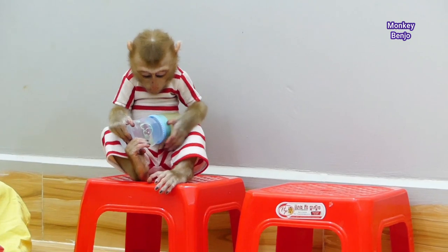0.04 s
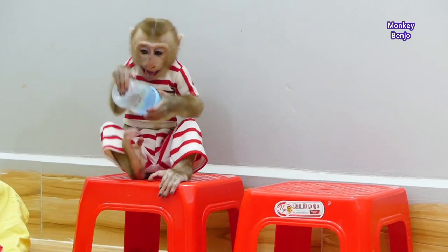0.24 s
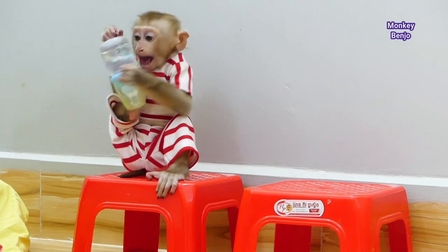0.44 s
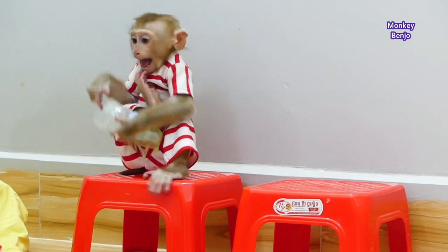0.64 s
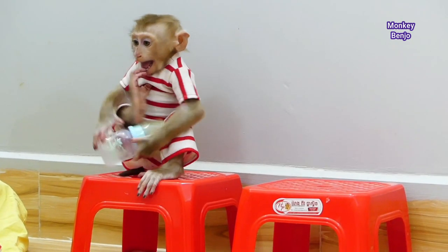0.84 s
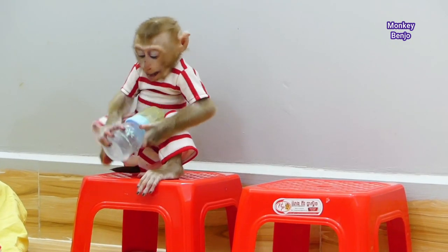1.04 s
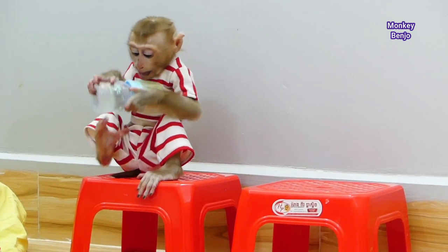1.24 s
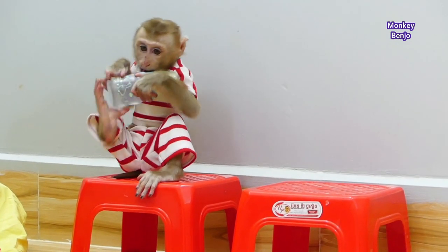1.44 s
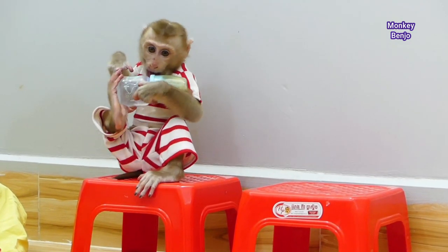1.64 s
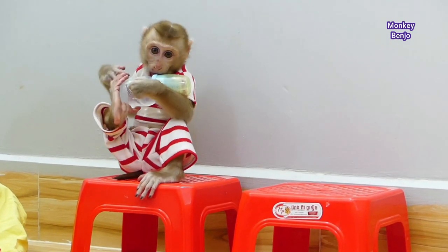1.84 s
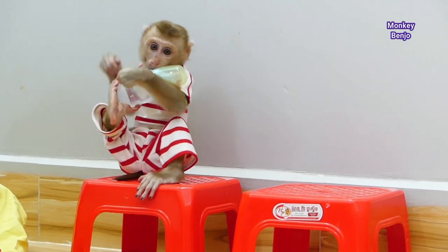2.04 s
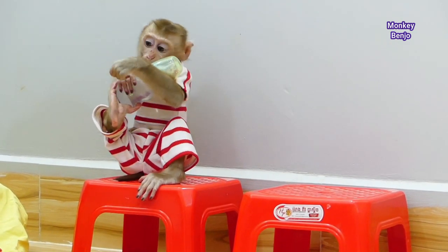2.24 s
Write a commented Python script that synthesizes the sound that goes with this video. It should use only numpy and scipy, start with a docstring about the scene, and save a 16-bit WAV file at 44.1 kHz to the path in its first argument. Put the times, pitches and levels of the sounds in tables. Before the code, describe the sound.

A small monkey gives five short, harsh, breathy rasps in quick succession, then a wet lip smack. Faint cloth rustles and ticks follow. The bare room echoes, with dull background noise and a low hum.

```python
"""In a bare, echoing room: five short, harsh rasps and a smack, probably from a small monkey
wrestling with a baby bottle. The rasps are all breath and no voice. Each opens with a snap and a
falling hiss; rough air then makes the mouth ring at a sliding pitch near 3-4 kHz, over weaker,
hollow tones. Faint rustles and ticks of handling, dull room noise and a low hum fill the pauses."""
import sys
import numpy as np
from scipy import signal
from scipy.fft import rfft, irfft
from scipy.io import wavfile

SR = 44100
rng = np.random.default_rng(int(sys.argv[2]) if len(sys.argv) > 2 else 0)


def dump(signal):
    """Clip the signal to [-1, 1] and save it as 16-bit WAV at the path in sys.argv[1]."""
    limited = np.clip(np.atleast_2d(signal).T, -1, 1)
    pcm = np.round(limited * 32767).astype(np.int16)
    wavfile.write(sys.argv[1], SR, pcm)


N = 105840
TIME = np.arange(N) / SR

# Rasps of breath (start [s], length [s], swell time [s], first ring pitch [Hz], last ring pitch [Hz],
# ring width [Hz], final ring level [dB], ring growth [dB], final throat level [dB], chest level [dB],
# hollow pitch [Hz], hollow level [dB], edge level [dB], hiss pitch [Hz], hiss level [dB])
RASPS = [(0.2222, 0.039, 0.0017, 3050, 3010, 376, -30.5, 4.5, -41.5, -51, 1020, -47.5, -39, 11000, -36.5),
         (0.414, 0.0582, 0.0066, 3670, 3970, 850, -32, 5, -37, -41, 855, -49, -42, 9560, -38),
         (0.656, 0.095, 0.093, 3500, 4440, 1340, -33, 0, -37.5, -51, 915, -46, -39, 9900, -34.5),
         (0.92, 0.09, 0.03, 4280, 3810, 900, -35, 4.5, -41.5, -46.5, 807, -50, -44, 9970, -38),
         (1.2038, 0.057, 0.0066, 3180, 3530, 1020, -40, 1, -45, -49.5, 783, -52, -47, 11100, -39)]
# Where the throat rings (pitch [Hz], width [Hz], relative level [dB])
THROAT_RINGS = [(1450, 410, 2), (2072, 580, 3), (3020, 1070, 4.5)]
# The bright edge above the throat's rings (pitch [Hz], width [Hz], relative level [dB])
EDGE_RINGS = [(5250, 2720, 1), (7000, 2100, -3.2)]
# Where the mouth rings in the closing smack (pitch [Hz], width [Hz], level [dB])
SMACK_RINGS = [(683, 280, -45), (1490, 220, -46), (2030, 470, -41.5), (3146, 540, -35), (3920, 1100, -43.5),
               (4450, 580, -46.5), (5290, 530, -44), (6030, 1200, -39.5), (6470, 530, -45),
               (9070, 1400, -43.5), (11600, 2600, -46.5)]
# Bright snaps of spit (start [s], pitch [Hz], width [Hz], level [dB])
SNAPS = [(0.228, 11500, 9000, -49), (.4157, 13000, 5000, -38.5), (.6625, 11400, 8900, -55),
         (0.929, 12600, 3500, -42), (0.972, 11000, 10900, -35), (1.2062, 12100, 2500, -40)]
# Clean pops, chirps and one chirp's wall echo
# (start [s], length [s], first pitch [Hz], last pitch [Hz], level [dB])
POPS = [(.226, 0.017, 1146, 1167, -41.5), (.227, 0.01, 2270, 2300, -35.5), (0.249, .017, 3220, 2876, -35),
        (0.282, 0.0043, 3020, 2920, -29.5), (0.418, .01, 3450, 3410, -34.5),
        (0.673, 0.014, 750, 782, -46.5), (1.56, 0.0144, 765, 739, -40), (1.554, 0.017, 3080, 2870, -39)]
# Short, ringing traces around the rasps and smack, low bumps and faint ticks
# (start [s], length [s], pitch [Hz], width [Hz], level [dB])
SMALL_SOUNDS = [(0.65, 0.035, 3590, 390, -35.5), (1.141, 0.0044, 3870, 490, -56),
                (1.23, 0.012, 3000, 320, -45.5), (1.423, 0.0073, 3500, 220, -46),
                (1.647, 0.018, 3010, 730, -41), (1.526, 0.037, 990, 1100, -49),
                (0.248, 0.026, 308, 140, -54.5), (0.42, 0.036, 359, 94, -48), (1, 0.021, 330, 116, -51),
                (0.55, 0.073, 357, 170, -51.5), (1.12, 0.0326, 300, 110, -53), (1.67, 0.07, 320, 220, -53),
                (2.174, .006, 12300, 3300, -56)]
# Rustles of cloth (middle [s], half length [s], level [dB])
RUSTLES = [(0.117, 0.068, -60), (1.762, 0.054, -56.5), (1.956, 0.089, -57), (2.224, 0.094, -61)]
# Tone of the cloth, from bass to treble (frequency [Hz], relative level [dB])
CLOTH_TONE = [(300, -8), (850, 4), (2000, -15.5), (5000, -9.5), (7500, -12.5), (9500, -8), (13000, -10.5),
              (16000, -18)]
# How long the echo takes to fade by 60 dB (frequency [Hz], time [s])
ECHO_FADE = [(200, 0.53), (500, 0.79), (1400, 0.93), (3600, 0.96), (6500, 0.81), (10000, 0.68),
             (15000, 0.41)]
# Stereo width of the echo (frequency [Hz], side level against the middle [dB])
ECHO_SPREAD = [(200, -10.5), (1000, -5), (3500, -10), (8000, -8.5), (14000, -2)]
# Tone of the room noise (frequency [Hz], relative level [dB])
ROOM_NOISE_TONE = [(15, -32), (28, -12), (45, -14), (80, -2), (140, -6), (260, 4), (500, -2.5), (850, -2.5),
                   (1500, -7.5), (3000, -16), (7000, -25), (12000, -27.5), (16000, -24)]
# Stereo width of the room noise (frequency [Hz], side level against the middle [dB])
ROOM_NOISE_SPREAD = [(150, 3.5), (400, -2)]


def rasp(start, length, attack, first_hz, last_hz, width_hz, ring_db, growth_db, throat_db, chest_db,
         hollow_hz, hollow_db, edge_db, hiss_hz, hiss_db):
    """A hiss comes first and sinks; the ring slides and grows as the mouth opens; a low puff ends it."""
    throat_growth_db, hiss_fall_hz = 3, 2900
    hiss_share, hollow_rise_per_s = 0.67, 2  # shares of the rasp's timing and of the hollow pitch
    air = rough_air()
    opening = np.clip((TIME - start) / length, 0, 1)  # 0 = mouth shut, 1 = open
    ring = undb(ring_db - growth_db * (1 - opening)) * glide(air, opening, first_hz, last_hz, width_hz)
    throat = undb(throat_db - throat_growth_db * (1 - opening)) * unit(cavity(THROAT_RINGS))
    edge = undb(edge_db) * unit(cavity(EDGE_RINGS))
    bend_hz = hollow_hz * hollow_rise_per_s * length / 2
    hollow = undb(hollow_db) * glide(air, opening, hollow_hz - bend_hz, hollow_hz + bend_hz, width_hz=344)
    chest = undb(chest_db) * opening ** 2 * resonate(air, hz=376, width_hz=158)
    body = (ring + throat + edge + hollow + chest) * envelope(start, length, attack, release=0.0086)
    hiss = glide(air, opening, hiss_hz + hiss_fall_hz / 2, hiss_hz - hiss_fall_hz / 2, width_hz=5100)
    hiss *= envelope(start, length * hiss_share, attack * hiss_share, release=0.017)
    return body + undb(hiss_db) * hiss


def rough_air():
    """Rough breath: tiny pops at random moments, mixed with the rush of swirling air."""
    pops_per_s, scatter_db, rush_share = 800, 2, 0.6
    hits = rng.random(N) < pops_per_s / SR
    flutter = hits * undb(scatter_db * np.clip(rng.standard_normal(N), -2, 2))
    return np.sqrt(1 - rush_share) * unit(flutter) + np.sqrt(rush_share) * rng.standard_normal(N)


def cavity(rings):
    """Rough air makes a hollow space, like the mouth or throat, ring at several pitches at once."""
    return sum(undb(db) * resonate(rough_air(), hz, width_hz) for hz, width_hz, db in rings)


def resonate(x, hz, width_hz):
    """Makes a sound ring near one pitch by filtering it twice; a smaller width gives a purer tone."""
    b, a = signal.iirpeak(min(hz, 0.45 * SR), hz / width_hz, fs=SR)
    return unit(signal.lfilter(b, a, signal.lfilter(b, a, x)))


def glide(x, progress, first_hz, last_hz, width_hz):
    """A ring that slides in pitch, fading through five steady rings as progress goes from 0 to 1."""
    steps = np.linspace(0, 1, 5)
    out = 0
    for step in steps:
        weight = np.maximum(1 - abs(progress - step) / steps[1], 0)
        out += weight * resonate(x, first_hz + step * (last_hz - first_hz), width_hz)
    return out


def envelope(start, length, attack, release):
    """Loudness over time: open suddenly, swell, hold, then die away. All times are in seconds."""
    onset_s, swell_db = 0.0071, 7
    age = TIME - start
    swell = undb(-swell_db * (1 - np.clip(age / attack, 0, 1)))
    fade = np.exp(-np.maximum(age - length, 0) / release)
    return np.clip(age / onset_s, 0, 1) * swell * fade


def smack():
    """A short, wet click that makes the mouth ring as it opens, with a little spray."""
    mouth = cavity(SMACK_RINGS)
    spray = undb(-44.5) * resonate(rough_air(), hz=9000, width_hz=20000)
    return (mouth + spray) * envelope(start=1.5565, length=0.015, attack=0.007, release=0.025)


def snaps():
    """Crisp, bright spits that start at once and die in milliseconds."""
    fade_s = 0.01
    out = 0
    for start, hz, width_hz, db in SNAPS:
        age = TIME - start
        fade = (age > 0) * np.exp(-np.abs(age) / fade_s)
        out += undb(db) * resonate(rough_air(), hz, width_hz) * fade
    return out


def pops():
    """Clean pops and chirps from the mouth, and one quick wall echo of the first chirp."""
    out = 0
    for start, length, first_hz, last_hz, db in POPS:
        hz = np.interp(TIME, [start, start + length], [first_hz, last_hz])
        tone = unit(np.sin(2 * np.pi * np.cumsum(hz) / SR))
        out += undb(db) * tone * envelope(start, length, attack=0.0051, release=0.0014)
    return out


def small_sounds():
    """Short, ringing traces around the rasps and smack, with low bumps and faint ticks."""
    out = 0
    for start, length, hz, width_hz, db in SMALL_SOUNDS:
        ring = resonate(rough_air(), hz, width_hz)
        out += undb(db) * ring * envelope(start, length, attack=length / 2, release=0.004)
    return out


def rustles():
    """Soft swells of rustling cloth."""
    swells = sum(undb(db) * np.exp(-((TIME - middle) / half) ** 2) for middle, half, db in RUSTLES)
    return swells * unit(noise(CLOTH_TONE))


def room(x):
    """The sound itself plus a dense echo off hard walls, which fades fastest in the high treble."""
    direct_db, echo_db, delay_s, build_s = -4, -1.5, 0.00033, 0.00074
    middle, side = rng.standard_normal(N), noise(ECHO_SPREAD)
    hz, age, bands = signal.stft(stereo(middle, side), SR, nperseg=256)
    fade = np.exp(-np.log(1000) * age / value_at(hz, ECHO_FADE)[:, None])  # 1000 times weaker = 60 dB
    tail = signal.istft(bands * fade, SR)[1][:, :N]
    tail *= 1 - np.exp(-np.maximum(TIME - delay_s, 0) / build_s)
    tail = unit(tail) / np.sqrt(N)
    echo = signal.fftconvolve(x[None], tail, axes=1)[:, :N]  # every moment of sound leaves this tail
    return undb(direct_db) * x + undb(echo_db) * echo


def background():
    """Dull room noise, wide in the bass, and a steady electrical hum."""
    noise_db, hum_db, hum_hz = -61.5, -69, 200.5
    middle = noise(ROOM_NOISE_TONE)
    side = noise([(hz, db + value_at(hz, ROOM_NOISE_SPREAD)) for hz, db in ROOM_NOISE_TONE])
    hum = unit(np.sin(2 * np.pi * hum_hz * TIME))
    return undb(noise_db) * stereo(middle, side) / np.std(middle) + undb(hum_db) * hum


def noise(tone):
    """Noise whose tone follows a list of (frequency [Hz], level [dB]) points."""
    gains = undb(value_at(np.fft.rfftfreq(N, 1 / SR), tone))
    return irfft(rfft(rng.standard_normal(N)) * gains, N)


def value_at(hz, points):
    """Reads between the rows of a frequency table, giving every octave equal room."""
    frequencies, values = np.array(points).T
    return np.interp(np.log(hz + 1), np.log(frequencies), values)


def stereo(middle, side):
    """Left and right share the middle; the side is what sets them apart."""
    return np.array([middle + side, middle - side])


def undb(db):
    """Turns decibels into a number to multiply by."""
    return 10 ** (np.asarray(db) / 20)


def unit(x):
    """Scales a sound to an average strength (rms) of 1."""
    return x / np.sqrt(np.mean(x ** 2))


def scene():
    """All the sounds in the room, over its background; snaps and pops arrive with less echo."""
    snap, pop = snaps(), pops()
    rasps = sum(rasp(*row) for row in RASPS)
    sources = rasps + smack() + snap + undb(-3) * pop + small_sounds() + rustles()
    without_echo = undb(-11) * snap + undb(-5) * pop
    return room(sources) + without_echo + background()


def record(dry):
    """Cuts off the very highest treble."""
    top_hz = 15700
    return signal.sosfilt(signal.ellip(8, 0.2, 70, top_hz, fs=SR, output="sos"), dry)


dry = scene()
out = record(dry)
dump(out)
```